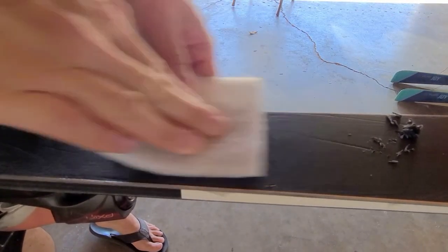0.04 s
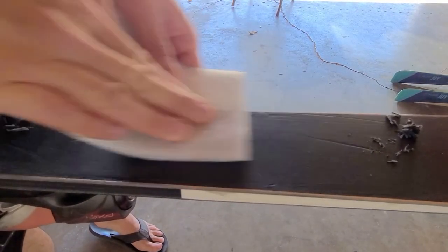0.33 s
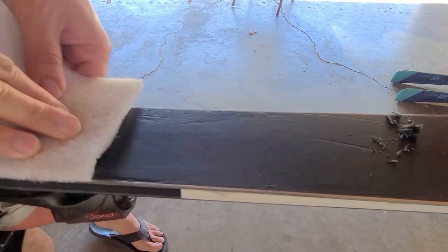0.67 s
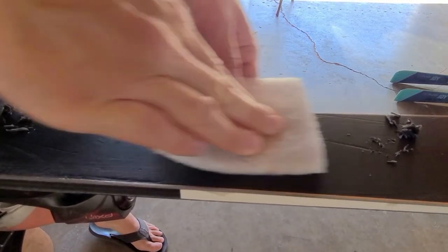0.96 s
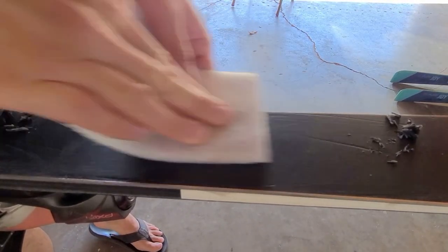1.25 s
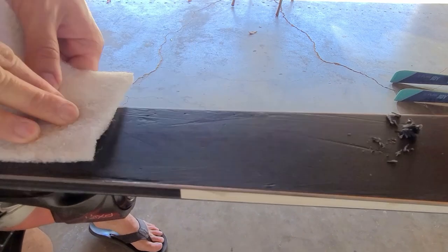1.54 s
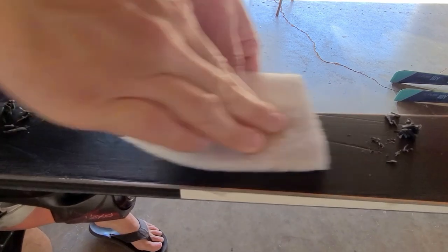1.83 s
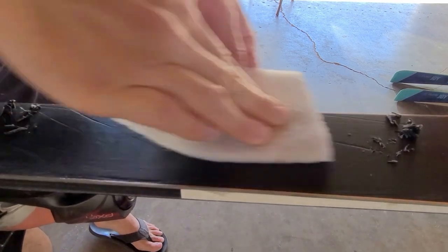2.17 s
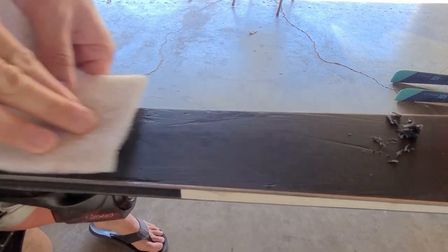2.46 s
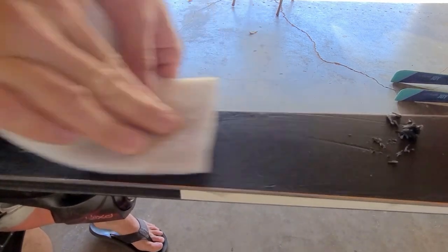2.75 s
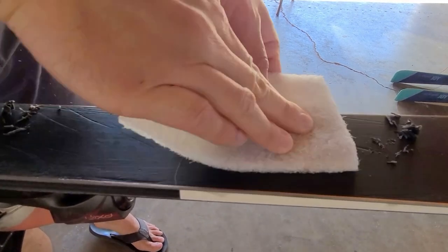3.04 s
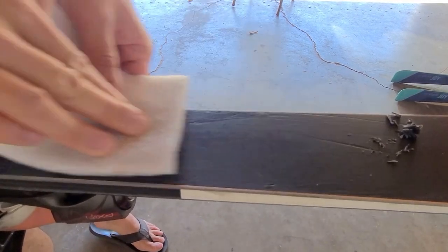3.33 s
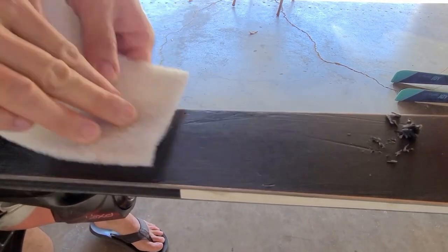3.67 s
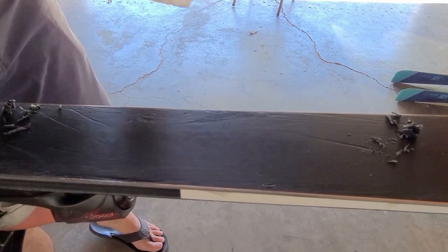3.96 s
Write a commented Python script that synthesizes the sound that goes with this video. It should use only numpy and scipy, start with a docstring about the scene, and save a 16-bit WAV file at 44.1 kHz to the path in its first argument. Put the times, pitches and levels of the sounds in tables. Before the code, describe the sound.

A fibre pad rubs quickly back and forth along a waxed ski, close to the microphone, each stroke a bright hiss with a gritty rasp. It lifts away with a faint rustle, over low workshop rumble.

```python
"""A fibre pad rubbed along a ski base, close to a stereo microphone: seventeen quick strokes, then off.
The fibres hiss with the speed of the hand; wax residue rasps beneath them and now and then catches.
Reflections off hand, ski and bench shift as the pad travels a little to left and right.
Farther back the workshop rumbles, with a few low resonances and a wavering hum."""
import sys
import numpy as np
from scipy.fft import rfft, irfft
from scipy.io import wavfile

SR = 44100
rng = np.random.default_rng(int(sys.argv[2]) if len(sys.argv) > 2 else 0)


def to_wav(sig):
    """Store sig (one row per channel, or 1-D mono) as 16-bit WAV at the path in sys.argv[1].

    Samples outside -1..1 are clipped; the rate is SR.
    """
    pcm = np.clip(np.atleast_2d(sig), -1, 1) * 32767
    pcm = np.round(pcm).astype(np.int16)
    wavfile.write(sys.argv[1], SR, pcm.T)  # frames by channels


N = 176400
TIME, FREQ = np.arange(N) / SR, np.maximum(np.fft.rfftfreq(N, 1 / SR), 1)
SIDES = np.array([[1], [-1]])   # left, right

# passes of the pad, before reflections:
# (start [s], hiss [dB], rasp [dB], fastest point [0-1], speed at the opening turn [0-1])
PAD_STROKES = [(-.02, -50, -58, 0.43, 0.54), (.203, -49, -58.5, 0.46, 0.1), (0.435, -49, -57.5, 0.51, 0.27),
               (.687, -49.5, -57.5, 0.42, 0.3), (0.909, -48.5, -57.5, 0.49, 0.34),
               (1.137, -48.5, -57, 0.47, .06), (1.356, -49.5, -58, 0.43, 0.14),
               (1.572, -49, -58.5, 0.37, 0.13), (1.787, -49, -56, 0.38, 0.11),
               (1.996, -50.5, -55, 0.44, 0.12), (2.213, -48.5, -57, 0.51, 0.17),
               (2.431, -50.5, -59.5, 0.43, 0.13), (2.65, -51.5, -55, 0.37, 0), (2.854, -52, -57, 0.52, 0),
               (3.064, -52, -57.5, 0.36, 0.14), (3.275, -52.5, -59.5, 0.58, 0.08),
               (3.481, -53, -63, 0.35, 0.18)]
# colours of fibres, wax and ski: (frequency [Hz], relative level [dB])
FIBRE_COLOUR = [(1500, -41), (3500, -34.5), (5200, -7.5), (6300, -3), (7500, -0.5), (9000, -2.5),
                (11000, -0.5), (13000, 1), (15700, -1.5)]
WAX_COLOUR = [(700, -5.5), (1500, -4), (2300, -5), (3100, -1), (4400, 0), (5400, -2), (7000, -4),
              (9000, -6), (15000, -21)]
SKI_COLOUR = [(60, -12), (130, -0.5), (250, 1.5), (420, -1), (600, -6.5), (1000, -13.5), (2000, -16.5),
              (5000, -37)]
# snags, before reflections: (time [s], half length [s], level [dB], centre [Hz], width [octaves])
WAX_CATCHES = [(0.303, 0.023, -53, 1600, 2.7), (.47, 0.017, -57.5, 3600, 0.66),
               (.775, 0.0093, -61, 1720, 0.94), (1.298, 0.031, -60, 2400, 1.2),
               (1.31, 0.00084, -49, 6000, 1.6), (1.313, .002, -51, 7000, 1.8),
               (1.636, .035, -64.5, 1920, 0.37), (1.965, 0.015, -59, 3400, 1.2),
               (2.02, 0.026, -54.5, 3250, 0.4), (2.116, 0.015, -55.5, 3420, 0.19),
               (2.724, 0.054, -61.5, 1600, 1.8), (3.029, 0.024, -57.5, 1600, 1.6),
               (3.378, 0.022, -62.5, 1090, .8)]
# hand and pad moving away: (frequency [Hz], relative level [dB])
RUSTLE_COLOUR = [(1500, -10), (2400, -4), (3100, 0), (4200, -2), (5000, -4), (6000, 0), (6900, -1),
                 (8000, -15), (15000, -22)]
# their rise and fade: (time [s], level [dB])
RUSTLE_FADE = [(3.6, -78), (3.7, -67), (3.8, -70.5), (3.9, -73.5), (4, -76)]
# room tone: (frequency [Hz], relative level [dB])
RUMBLE_COLOUR = [(25, -29), (36, -35), (50, -9), (75, 3), (115, -5), (170, -3), (250, -14.5), (420, -11),
                 (600, -20.5), (790, -16), (1000, -21.5), (1500, -23), (2200, -28)]
# low resonances of the room: (centre [Hz], half width [Hz], level [dB])
ROOM_RESONANCES = [(61.5, 15, -55.5), (89.7, 9.6, -54), (136.9, 10.3, -58), (211.5, 12.3, -62.5),
                   (256.3, 8, -64.5), (305.3, 19, -64.5), (328, 13.5, -64), (363, 7.6, -65),
                   (434.2, 2.4, -68), (467.7, 19, -67.5), (551.5, 5.3, -76), (956, 11.4, -72)]
# the hum's wavering: (time [s], level [dB])
HUM_LEVEL = [(0, -70), (1.4, -56.5), (1.65, -52), (2.05, -50.5), (2.8, -56.5), (3.3, -50), (3.55, -59),
             (3.9, -54.5)]
# stereo image of pad and room: (frequency [Hz], left minus right [dB])
PAD_IMAGE = [(500, -3.5), (2000, 1.5), (3300, 0.5), (5000, 2), (6500, 6.5), (8700, -1), (11000, 2),
             (15000, 4.5)]
ROOM_IMAGE = [(100, -0.9), (270, -.5), (450, -0.5), (1500, -1.8), (4500, 4), (6500, -3), (8500, 1),
              (15000, 0)]
# likeness of the microphone's two channels: (frequency [Hz], correlation [-1 to 1])
MIC_CORRELATION = [(60, 0.93), (120, 0.99), (240, 0.95), (480, 0.57), (950, 0.051), (1900, -0.21),
                   (3800, -0.1), (15000, 0.04)]

LIFT_S, LIFT_FADE_S = 3.692, 0.033   # the pad leaves the ski
GRIP = 1.44   # friction levels off at speed
HISS_POWER, RASP_POWER, SKI_POWER = 1.47, 0.67, 0.27   # amplitude goes as friction to this power
SKI_DB, SKI_START_DB, SKI_FULL_S = -57, -6.5, 1.1   # the ski's voice builds over the first strokes
ECHO_FIRST_S, ECHO_SPAN_S, ECHO_TRAVEL_S, ECHO_WANDER_S = 0.000581, 0.006, 0.000297, 0.00008
ECHO_DB, SWING_DB = -4, 1.1
RUMBLE_DB, RUMBLE_TOP_HZ = -52.5, 2600
MIC_HISS_DB, CUTOFF_HZ = -79, 15900


def rubbing():
    """Close up: friction from the moving pad drives fibre hiss, wax rasp and the ski's dull voice."""
    speed, place, hiss_gain, rasp_gain = hand()
    friction = np.tanh(GRIP * speed) / np.tanh(GRIP)
    hiss = hiss_gain * friction ** HISS_POWER * fibre_hiss()
    rasp = rasp_gain * friction ** RASP_POWER * wax_rasp()
    ski = friction ** SKI_POWER * ski_body()
    pressure = from_db(0.67 * drift(hz=36))   # unsteady hand
    contact = (hiss + rasp) * pressure + wax_catches()
    return bench_reflections(contact, place) + ski


def hand():
    """Back and forth: speed (an arch per stroke), place on the ski (-1 to 1), hiss and rasp gains."""
    start, hiss_db, rasp_db, fastest, turn_speed = np.transpose(PAD_STROKES)
    edges = np.append(start, LIFT_S)
    peaks = start + fastest * np.diff(edges)
    knots = np.sort(np.append(edges, peaks))
    angle = np.interp(TIME, knots, np.arange(len(knots)) * np.pi / 2)   # half a circle per stroke
    lift_fade = np.exp(-np.maximum(TIME - LIFT_S, 0) / LIFT_FADE_S)
    speed = np.hypot(np.sin(angle), np.interp(TIME, start, turn_speed) * np.cos(angle)) * lift_fade
    hiss_gain = from_db(np.interp(TIME, peaks, hiss_db))
    rasp_gain = from_db(np.interp(TIME, peaks, rasp_db))
    return speed, -np.cos(angle), hiss_gain, rasp_gain


def fibre_hiss():
    """Fibres sliding on the base make a smooth, bright noise; rms 1."""
    return coloured(stereo_noise(PAD_IMAGE), from_db(over_hz(FIBRE_COLOUR)))


def wax_rasp():
    """Gritty bands, each swelling and sinking by itself with the wax under the pad; rms 1."""
    grit = stereo_noise(PAD_IMAGE, rough_db=1.4)
    colour = from_db(over_hz(WAX_COLOUR))
    rasp = 0
    for hz in np.geomspace(900, 12000, num=8):
        band = bell(hz, octaves=0.3) * colour
        patchiness = from_db(1.25 * drift(hz=31))
        rasp += np.sqrt(np.mean(band ** 2)) * patchiness * coloured(grit, band)
    return rms_one(rasp)


def ski_body():
    """The rubbed ski answers with a dull noise that builds, then holds."""
    level = from_db(SKI_DB + SKI_START_DB * np.maximum(1 - TIME / SKI_FULL_S, 0))
    return level * coloured(stereo_noise(PAD_IMAGE), from_db(over_hz(SKI_COLOUR)))


def wax_catches():
    """Short gritty swells where the pad drags over wax."""
    grit = stereo_noise(PAD_IMAGE, rough_db=2.0)
    snags = 0
    for time_s, half_length_s, db, hz, octaves in WAX_CATCHES:
        swell = gaussian((TIME - time_s) / half_length_s)
        snags += from_db(db) * swell * coloured(grit, bell(hz, octaves))
    return snags


def bench_reflections(direct, place):
    """Hand, ski and bench send eight echoes to each channel; paths and pan follow the pad."""
    echoes = np.zeros((2, N))
    for k, (path, slant) in enumerate(rng.random((16, 2))):
        channel, polarity = k % 2, (-1) ** (k // 2)
        travel = ECHO_TRAVEL_S * (2 * slant - 1) * place
        delay = ECHO_FIRST_S + ECHO_SPAN_S * path + travel + ECHO_WANDER_S * drift(hz=1.7)
        echoes[channel] += polarity * np.interp(TIME - delay, TIME, direct[channel])
    pan = from_db(SIDES * place * SWING_DB / 2)
    return (direct + from_db(ECHO_DB) * echoes / np.sqrt(8)) * pan


def lift_off():
    """A faint rustle near the microphone as the hand takes the pad away."""
    level = gain_over_time(RUSTLE_FADE) * (TIME > RUSTLE_FADE[0][0])
    return level * coloured(stereo_noise(PAD_IMAGE, rough_db=1.7), from_db(over_hz(RUSTLE_COLOUR)))


def room_tone():
    """Behind the bench: steady rumble and the workshop's resonances, over faint microphone hiss."""
    roll_off = np.hypot(1, (FREQ / RUMBLE_TOP_HZ) ** 2)
    rumble = from_db(RUMBLE_DB) * rms_one(from_db(over_hz(RUMBLE_COLOUR)) / roll_off)
    mode_power = sum((from_db(db) * resonance(hz, width)) ** 2 for hz, width, db in ROOM_RESONANCES)
    power = rumble ** 2 + mode_power + from_db(MIC_HISS_DB) ** 2
    return np.sqrt(power.mean()) * coloured(stereo_noise(ROOM_IMAGE), np.sqrt(power))


def hum():
    """Back in the room, a narrow band of low noise swells and sinks."""
    band = resonance(hz=166.5, half_width_hz=5.4)
    return gain_over_time(HUM_LEVEL) * coloured(stereo_noise(ROOM_IMAGE), band)


def stereo_noise(image, rough_db=0):
    """Spectrum of white noise at the microphone, grainy by rough_db, balanced by image."""
    grain = from_db(rough_db * drift(hz=350))
    mid, side = rfft(rng.standard_normal((2, N)) * grain)
    alike = over_hz(MIC_CORRELATION)
    pair = np.sqrt(1 + alike) * mid + np.sqrt(1 - alike) * side * SIDES
    return pair * from_db(SIDES * over_hz(image) / 2)


def coloured(spectrum, gain):
    """Noise through a gain curve; rms 1."""
    return rms_one(irfft(spectrum * gain, N))


def drift(hz, step=20):
    """Random wander, mostly slower than hz; rms about 1."""
    white = rng.standard_normal(N // step)
    rates = np.fft.rfftfreq(len(white), step / SR)
    slow = irfft(rfft(white) / (1 + (rates / hz) ** 2))
    return np.interp(TIME, np.arange(len(slow)) * step / SR, rms_one(slow))


def resonance(hz, half_width_hz):
    """Steep-sided resonance curve of unit power."""
    return rms_one(1 / (1 + ((FREQ - hz) / half_width_hz) ** 2))


def bell(hz, octaves):
    """Bell-shaped band on a log-frequency axis."""
    return gaussian(np.log2(FREQ / hz) / octaves)


def gaussian(x):
    """Bell curve of height 1."""
    return np.exp(-0.5 * np.minimum(x ** 2, 36))


def over_hz(points):
    """Join (frequency [Hz], value) points on a log-frequency axis."""
    hz, value = np.transpose(points)
    return np.interp(np.log(FREQ), np.log(hz), value)


def gain_over_time(points):
    """Join (time [s], level [dB]) points into a gain curve."""
    return from_db(np.interp(TIME, *np.transpose(points)))


def from_db(db):
    """Decibels to gain."""
    return 10 ** (np.asarray(db) / 20)


def rms_one(x):
    """Scale to unit rms."""
    return x / np.sqrt(np.mean(x ** 2) + 1e-20)


def scene():
    """The pad on the ski in front, the workshop behind."""
    return rubbing() + lift_off() + room_tone() + hum()


def record(dry):
    """The microphone chain cuts the top steeply, over 150 Hz."""
    passband = np.clip((CUTOFF_HZ - FREQ) / 150 + 0.5, 0, 1)
    return irfft(rfft(dry) * passband, N)


dry = scene()
out = record(dry)
to_wav(out)
```